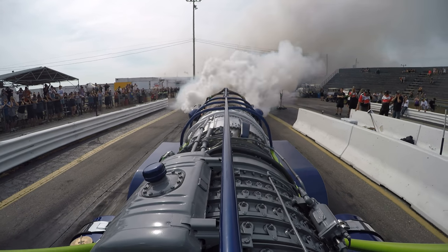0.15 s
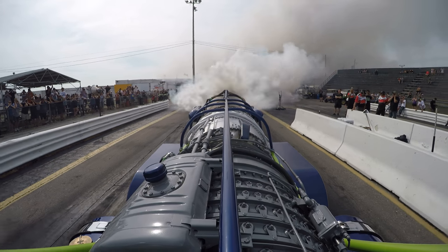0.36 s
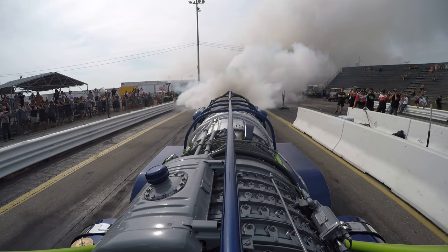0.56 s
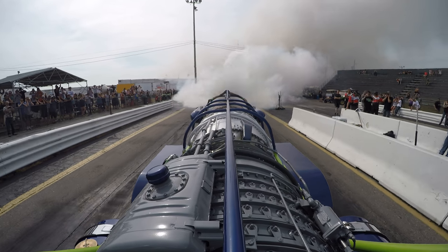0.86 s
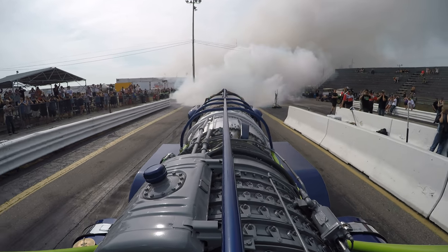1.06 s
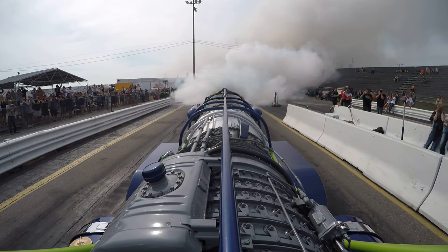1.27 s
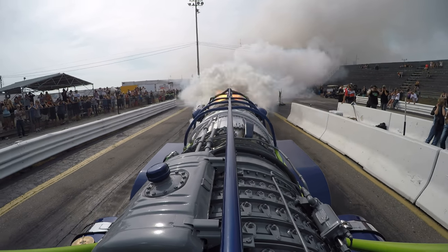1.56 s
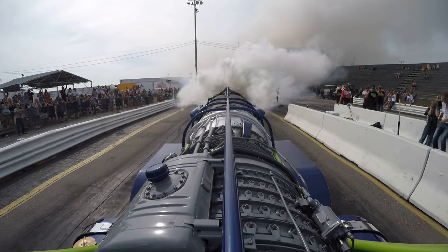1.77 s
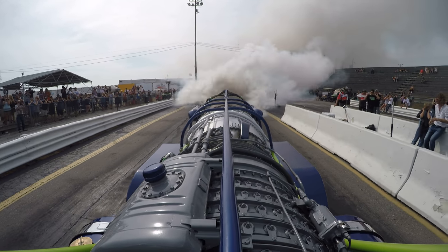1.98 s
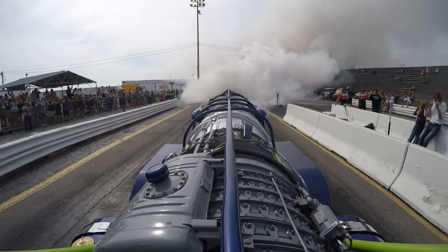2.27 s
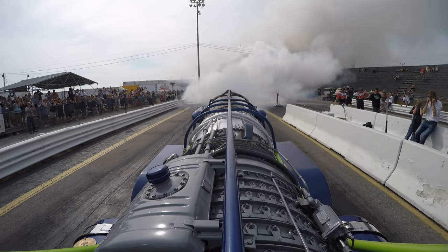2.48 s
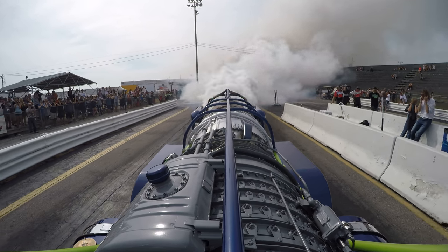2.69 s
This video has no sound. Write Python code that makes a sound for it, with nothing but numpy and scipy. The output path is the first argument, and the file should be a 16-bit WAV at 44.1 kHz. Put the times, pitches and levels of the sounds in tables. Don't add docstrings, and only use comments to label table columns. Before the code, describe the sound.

Close jet engine idling with a wavering high whine, rough burner roar, hissing exhaust, and buffeting wind.

```python
import sys
import numpy as np
from scipy import signal
from scipy.fft import rfft, irfft, next_fast_len
from scipy.io import wavfile
from scipy.ndimage import uniform_filter1d, map_coordinates

SR = 44100
rng = np.random.default_rng(int(sys.argv[2]) if len(sys.argv) > 2 else 0)


def to_wav(sig):
    pcm = np.clip(np.atleast_2d(sig), -1, 1) * 32767
    pcm = np.round(pcm).astype(np.int16)
    wavfile.write(sys.argv[1], SR, pcm.T)


def to_linear_factor(level_db):
    exponent = np.asarray(level_db, float) / 20
    return 10 ** exponent


N = 125685


def unit(x):
    return x / np.sqrt(np.mean(x ** 2) + 1e-20)


def curves(rows):
    s, *cols = np.transpose(rows)
    return [np.interp(np.arange(N) / SR, s, c) for c in cols]


def wobble(rate):
    return map_coordinates(rng.standard_normal(400), [np.arange(N) * rate / SR])


def bell(centre_s, half_s):
    return np.exp(-((np.arange(N) / SR - centre_s) / half_s) ** 2)


def filtered(x, response):
    m = next_fast_len(N + SR // 2)
    return irfft(rfft(x, m) * response(np.fft.rfftfreq(m, 1 / SR)), m)[..., :N]


def colour(points):
    f, db = np.transpose(points)
    return lambda hz: to_linear_factor(np.interp(np.log(hz + 1), np.log(f + 1), db))


def resonances(peaks):
    def response(f):
        total = 0
        for k, (centre, width, db) in enumerate(peaks):
            total = total + (-1) ** k * to_linear_factor(db) * 1j * f * width / (centre ** 2 - f * f + 1j * f * width)
        return total
    return response


def ringing(peaks):
    once = resonances([(centre, 1.31 * width, db / 2) for centre, width, db in peaks])
    return lambda f: once(f) ** 2


def rush(response, patchy_db):
    z = signal.stft(rng.standard_normal(N), nperseg=512)[2]
    field = uniform_filter1d(rng.standard_normal(z.shape), size=8, axis=0)
    field = uniform_filter1d(field, size=14, axis=1)
    patchy = signal.istft(z * to_linear_factor(patchy_db * unit(field)), nperseg=512)[1][:N]
    return unit(filtered(patchy, response))


def steadied(x, share, seconds):
    power = uniform_filter1d(x * x, int(seconds * SR))
    power = np.abs(uniform_filter1d(power, int(seconds * SR / 2)))
    return unit(x / (power + .02) ** (share / 2))


def wind(wind_db):
    # (f/Hz, level/dB)
    buffet_colour = [(11, -31), (18, -5), (54, -4.5), (72, -1), (113, -4), (140, -15), (180, 2.5),
                     (310, -120)]
    # (t/s, peak level/dB, f/Hz, phase/rad)
    pushes = [(0.133, -1.5, 34, 3), (.165, -12.5, 28.2, 3.3), (.36, -15, 35, 2), (.41, -18, 30, 4),
              (0.464, -14, 45, 2.2), (1.593, -17, 45, 1), (1.611, -21, 45, 3.1), (1.637, -15, 45, -0.5),
              (1.661, -14.5, 75, -0.5), (1.757, -12, 40, 0), (1.773, -15, 45, 3.5), (1.57, -1, 49.6, 3.5),
              (1.686, -5, 57.7, 1.5), (1.738, -5.5, 49, 4.5)]
    push_cycles = 0.5
    t = np.arange(N) / SR
    rumble = steadied(rush(colour(buffet_colour), patchy_db=-3.5), share=0.3, seconds=0.24)
    out = to_linear_factor(wind_db + 4.5 + wobble(13)) * rumble
    for s, db, hz, phase in pushes:
        out += to_linear_factor(db) * bell(s, push_cycles / hz) * np.cos(2 * np.pi * hz * (t - s) + phase)
    return out


def exhaust(thrust_db, burn_db):
    # (f/Hz, level/dB)
    jet_colour = [(710, -37), (1200, -9), (2020, -13.5), (2300, -0.5), (3110, -9.5), (6510, -13.5),
                  (14700, -27.5), (15500, -27), (16000, -63)]
    # (f/Hz, width/Hz, level/dB)
    duct = [(2262, 135, -1), (2830, 194, -5), (6386, 580, -11.5)]
    hiss = to_linear_factor(2 + 0.36 * wobble(7.04)) * rush(colour(jet_colour), patchy_db=1.5)
    swing_db = 0.2 * (burn_db - burn_db.mean() - thrust_db + thrust_db.mean())
    intake = to_linear_factor(-2.5 + swing_db) * rush(ringing(duct), patchy_db=0.5)
    return to_linear_factor(thrust_db) * (hiss + intake)


def burner(level_db):
    # (f/Hz, width/Hz, level/dB)
    short_modes = [(311.3, 32.3, -7), (540.6, 42.7, -6), (659.5, 38.3, 1.5), (781, 55, -2), (976, 49, 0),
                   (1125, 94, -7), (1641, 44, -10)]
    # (f/Hz, width/Hz, level/dB)
    long_modes = [(152, 5.9, -1), (186, 10.3, -1), (216.4, 17.2, -7.5)]
    # (f/Hz, level/dB)
    burn_colour = [(59, -36), (100, -8.5), (161, 1), (412, -17), (655, -15.5), (886, -6.5), (979, -0.5),
                   (1460, -20.5), (2000, -6), (2600, -57), (4400, -120)]
    # (t/s, level/dB, f/Hz, half length/s)
    surges = [(.0, -20, 161, 0.025), (0.047, -24, 187.3, 0.048), (0.154, -37, 180.4, 0.12),
              (0.223, -26, 171, 0.037), (0.304, -19, 156, 0.058), (0.379, -19.5, 156, 0.03),
              (0.442, -17.5, 186, 0.025), (.48, -18.5, 155, 0.029), (0.543, -22.5, 186, 0.025),
              (0.649, -27, 152, .06), (0.735, -27, 175.3, 0.053), (0.793, -28, 152, 0.098),
              (1.004, -30.5, 148.6, 0.06), (1.085, -23, 186, 0.049), (1.095, -25.5, 150.5, 0.059),
              (1.284, -25.5, 185.2, .05), (1.294, -16.5, 154, 0.089), (1.413, -18, 155.6, 0.04),
              (1.5, -15, 186, 0.058), (1.633, -24.5, 170.5, .04), (1.716, -16, 166, 0.039),
              (1.82, -13, 166, 0.034), (1.897, -14.5, 162, 0.035), (2.021, -26.5, 150, .03),
              (2.082, -23, 178, 0.046), (2.2, -26, 150.1, 0.042), (2.327, -25.5, 153.4, 0.029),
              (2.463, -27.5, 153, 0.039), (2.567, -28, 154.8, 0.036), (2.626, -21.5, 180.1, 0.044),
              (2.643, -21, 151.3, 0.045), (2.734, -23.5, 148, 0.038), (2.848, -25, 184.2, 0.029)]
    t = np.arange(N) / SR
    drift = np.cumsum(2 * wobble(16)) / SR
    first_hz, first_width, _ = short_modes[0]
    sing = np.zeros(N)
    for s, db, hz, half in surges:
        near = np.abs(t - s) < np.pi * half
        phase = 2 * np.pi * (hz * t[near] + drift[near])
        swell = to_linear_factor(db - 8.9 * ((t[near] - s) / half) ** 2)
        octave = to_linear_factor(1.5) / (1 + ((2 * hz - first_hz) / first_width * 2) ** 4)
        sing[near] += np.sqrt(2) * swell * (np.sin(phase) + octave * swell * np.sin(2 * phase))
    murmur = steadied(rush(ringing(long_modes), patchy_db=0.5), share=0.44, seconds=0.057)
    murmur = to_linear_factor(-1 - wobble(10.7)) * murmur
    roar = rush(ringing(short_modes), patchy_db=1.5)
    roar = roar + to_linear_factor(-1) * rush(colour(burn_colour), patchy_db=-0.5)
    return sing + to_linear_factor(level_db) * murmur + to_linear_factor(level_db - 1.0) * roar


def compressor(thrust_db):
    blades = (21, 23, 27, 42, 63)
    flutter_db = (0.84, 1.8, 1.1, 2.1, 0.73)
    faint_orders = (15, 30, 33, 36, 46, 48, 57, 69, 84)
    faint_db = [-45.5, -60, -44.5, -45, -45, -50, -44, -94, -77]
    # (t/s, order, level/dB, half length/s)
    glimpses = [(0.682, 46, -43, 0.085), (0.698, 84, -54, 0.11), (.85, 33, -40, 0.051),
                (0.969, 84, -50, 0.053), (1, 30, -39, 0.059), (1, 48, -53, 0.24), (1.15, 121, -57, 0.068),
                (1, 121, -53, .05), (1.87, 84, -46, .08), (1.45, 84, -48, 0.061), (1.518, 36, -41, .06),
                (1.549, 48, -46, 0.16), (2, 46, -39, 0.17), (2.13, 33, -38, 0.12), (2.13, 30, -40, .07),
                (2.298, 69, -40, 0.079), (2.317, 46, -39, 0.11), (2.42, 84, -47, 0.27)]
    # (t/s, f/Hz)
    shaft = [(0.0, 109.2), (0.12, 111.4), (0.22, 109.6), (0.33, 108.3), (0.48, 109.7), (0.6, 108.2),
             (0.8, 105.3), (1.1, 101.3), (1.2, 100.3), (1.28, 101.1), (1.55, 106.2), (1.8, 110.7),
             (1.97, 112.6), (2.1, 110.9), (2.42, 105.5), (2.53, 103.9), (2.62, 105), (2.85, 109.8)]
    # (t/s, level/dB)
    first = [(0, -23.5), (.3, -16.5), (.67, -15), (.84, -14.5), (.88, -21.5), (.97, -18.5), (1.07, -30),
             (1.17, -20), (1.33, -24.5), (1.53, -14.5), (1.69, -14.5), (1.86, -28.5), (2.05, -19.5),
             (2.23, -20), (2.41, -13.5), (2.52, -21.5), (2.78, -11), (2.85, -24.5)]
    # (t/s, level/dB)
    second = [(.17, -44), (.24, -24.5), (.42, -24.5), (.49, -34), (.58, -21), (.66, -37), (.75, -23.5),
              (.93, -23.5), (1.06, -17), (1.23, -28.5), (1.37, -16), (1.55, -36), (1.72, -27), (1.8, -61),
              (2.14, -38), (2.2, -27.5), (2.44, -26), (2.85, -29)]
    # (t/s, third stage level/dB, first stage octave level/dB, first stage twelfth level/dB)
    upper = [(0, -38, -33, -35), (.3, -34, -31.5, -37), (.53, -51, -38, -40), (.6, -30, -32, -39),
             (.72, -34, -33, -47), (.82, -34.5, -43.5, -37), (1.1, -36, -34, -34), (1.4, -33, -39, -42),
             (1.52, -30.5, -38, -44), (1.65, -49, -39.5, -51), (1.85, -39, -38, -34.5),
             (2, -27.5, -29, -38), (2.12, -46, -40, -30.5), (2.21, -24, -29.5, -33), (2.4, -34, -37, -38),
             (2.6, -36, -35.5, -35.5), (2.72, -31, -43, -47), (2.8, -42, -31.5, -46)]
    # (t/s, change of first stage level/dB, half length/s)
    eddies = [
        (0.095, -8, 0.0081),
        (0.247, -7, 0.009),
        (1.845, -12, .015),
        (1.938, 8, 0.0069),
        (1.993, -15, .008),
        (2.044, 3, 0.013),
        (2.229, -9, .015),
    ]
    levels = curves(first) + curves(second) + curves(upper)
    for s, db, half in eddies:
        levels[0] = levels[0] + db * bell(s, half)
    speed = uniform_filter1d(curves(shaft)[0], size=2500)
    turns = 2 * np.pi * np.cumsum(speed) / SR
    flicker_db = 1.5 * np.maximum(thrust_db + 25.5, 0)

    def haze(f):
        return 1 / (1 + (f / 110) ** 2)

    whine = np.zeros(N)
    for k, db, sway_db in zip(blades, levels, flutter_db):
        tone_db = db + sway_db * wobble(30) + flicker_db * np.tanh(wobble(70))
        skirt = unit(filtered(rng.standard_normal(N), haze))
        skirt_db = db.mean() - 33 + 0.81 * flicker_db
        whine += to_linear_factor(tone_db) * np.sin(k * turns) + to_linear_factor(skirt_db) * skirt * np.cos(k * turns)
    for k, db in zip(faint_orders, faint_db):
        whine += to_linear_factor(db + 1.5 * wobble(4.2)) * np.sin(k * turns + k * k)
    for s, order, db, half in glimpses:
        k = round(order)
        whine += to_linear_factor(db) * bell(s, half) * np.sin(k * turns + k ** 2)
    return np.sqrt(2) * whine


def scene():
    # (t/s, level/dB)
    fuel = [(0.0, -27), (0.17, -25), (0.46, -27.5), (0.54, -31.5), (0.75, -33.5), (1.2, -28), (1.27, -24.5),
            (1.48, -24), (1.68, -28.5), (1.84, -26), (2.1, -30), (2.5, -33), (2.6, -26), (2.78, -27.5),
            (2.85, -25)]
    # (t/s, level/dB)
    thrust = [(0.0, -26), (0.09, -23), (0.35, -26), (0.73, -26), (0.76, -29), (1.26, -26), (1.55, -28),
              (1.61, -31), (1.94, -23), (2.23, -22), (2.43, -28), (2.6, -27), (2.71, -30), (2.85, -26)]
    # (t/s, level/dB)
    gusts = [(0.0, -37), (0.13, -24.5), (0.27, -36.5), (0.33, -25), (0.47, -36), (0.52, -33), (0.67, -30.5),
             (0.73, -40.5), (1.2, -48), (1.3, -34), (1.52, -38), (1.6, -19.5), (1.76, -29), (1.86, -32),
             (2.1, -37.5), (2.47, -42.5), (2.6, -42), (2.85, -36)]
    burn_db, thrust_db, wind_db = curves(fuel)[0], curves(thrust)[0], curves(gusts)[0]
    mono = wind(wind_db) + exhaust(thrust_db, burn_db) + burner(burn_db) + compressor(thrust_db)
    return np.array([mono, mono])


def low_pass(x):
    return signal.sosfilt(signal.butter(12, 15310, fs=SR, output="sos"), x)


def record(dry):
    # (t/s, low edge f/Hz, high edge f/Hz)
    fills = [(.515, 4600, 5800), (.515, 9600, 11100), (.515, 13100, 14600), (.84, 5200, 6400),
             (.84, 12400, 14600), (.885, 8900, 11100), (1.605, 4200, 5800), (1.605, 7600, 11100),
             (1.605, 12400, 13900), (2.165, 7500, 9000), (2.165, 9600, 11100)]
    fill_s = 0.026
    x = dry / (1 + np.abs(dry / .94) ** 12) ** (1 / 12)
    t = np.arange(N) / SR
    other = np.roll(x[0], 3000)
    side = np.zeros(N)
    for s, low, high in fills:
        band = filtered(other, lambda f: (f > low) & (f < high))
        side += np.exp(-((t - s) / fill_s * 2) ** 4) * band
    return low_pass(x + to_linear_factor(-2.5) * side * np.array([[1], [-1]]))


dry = scene()
out = record(dry)
to_wav(out)
```